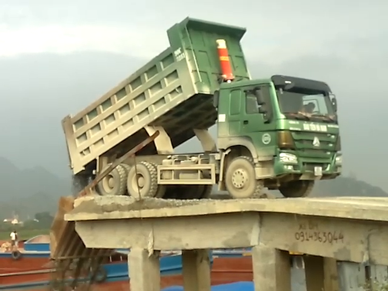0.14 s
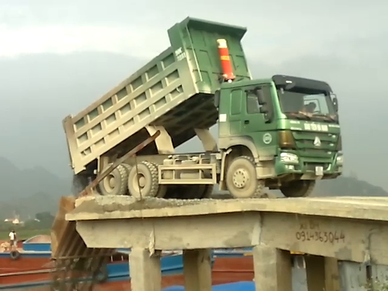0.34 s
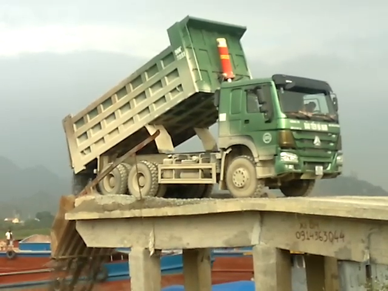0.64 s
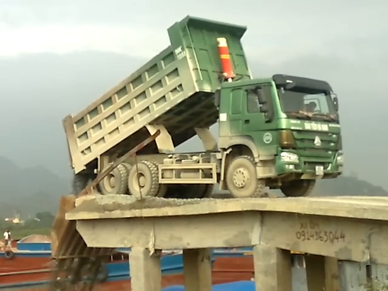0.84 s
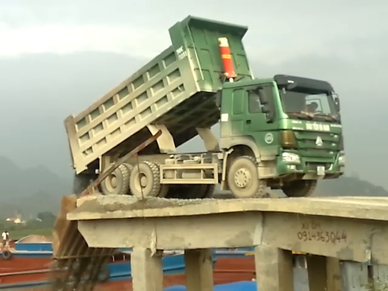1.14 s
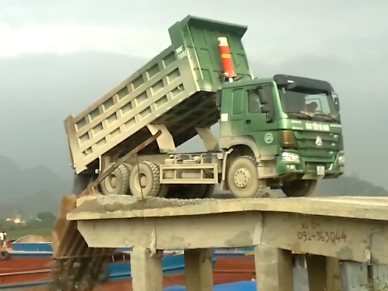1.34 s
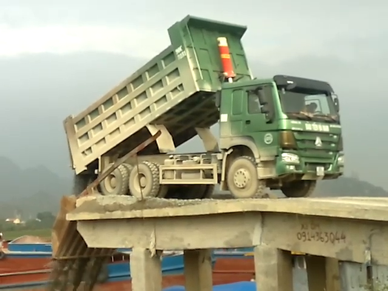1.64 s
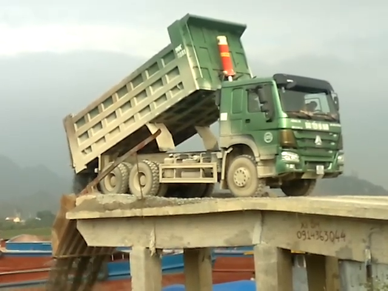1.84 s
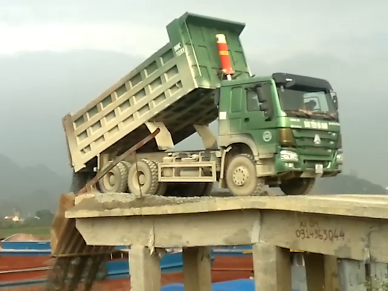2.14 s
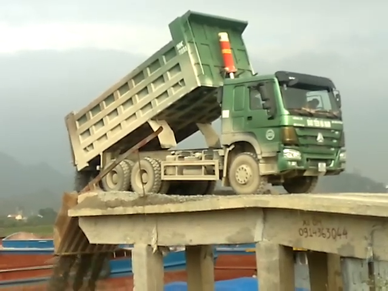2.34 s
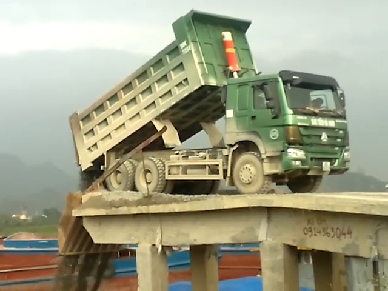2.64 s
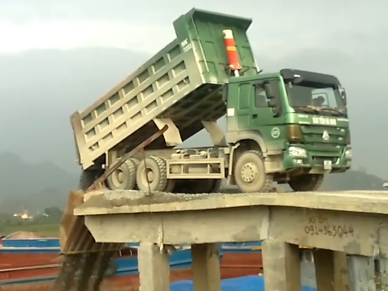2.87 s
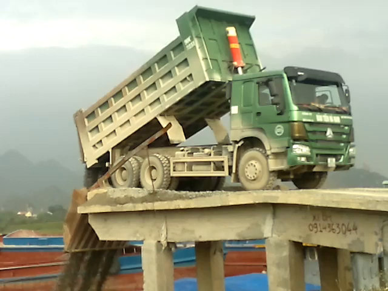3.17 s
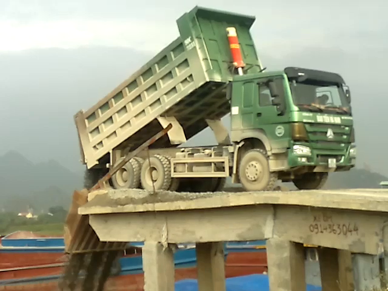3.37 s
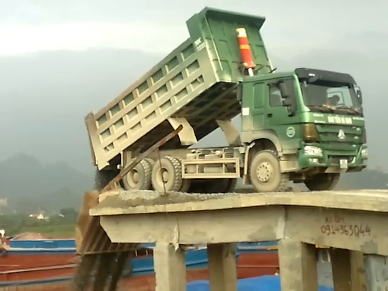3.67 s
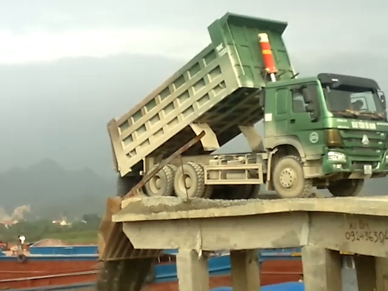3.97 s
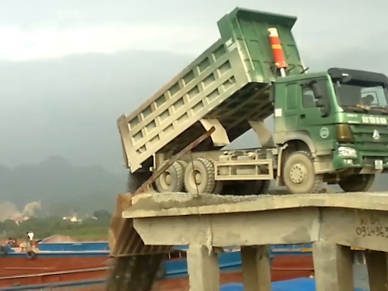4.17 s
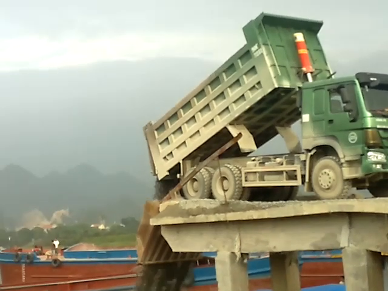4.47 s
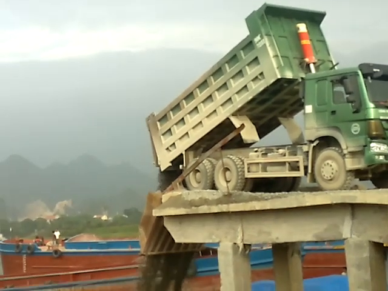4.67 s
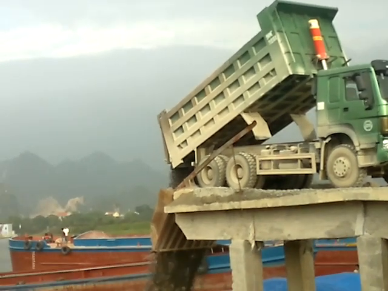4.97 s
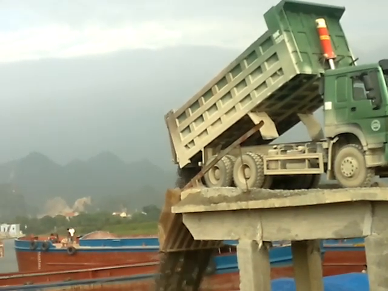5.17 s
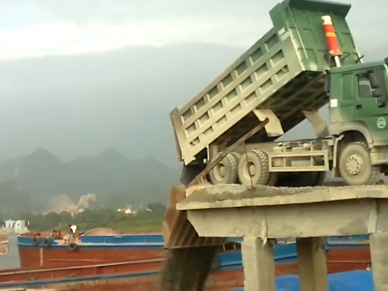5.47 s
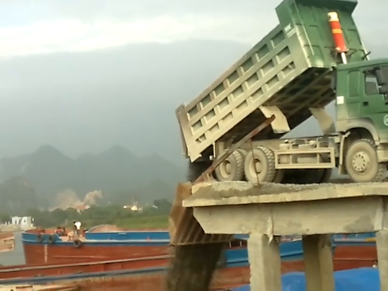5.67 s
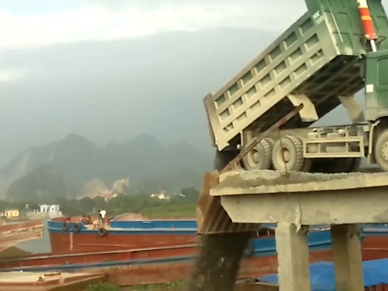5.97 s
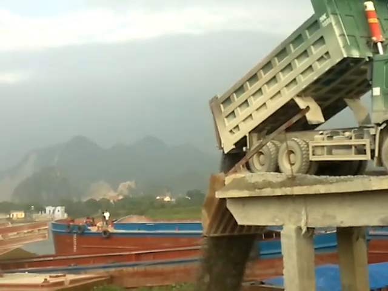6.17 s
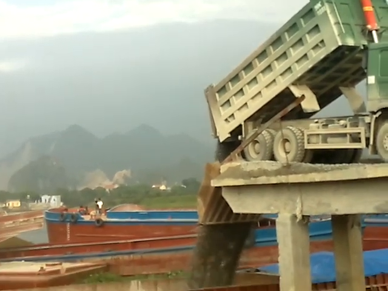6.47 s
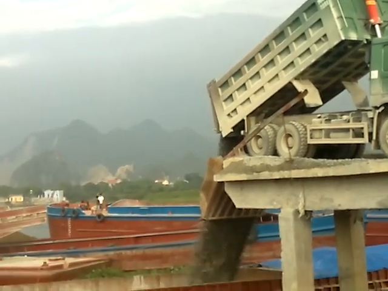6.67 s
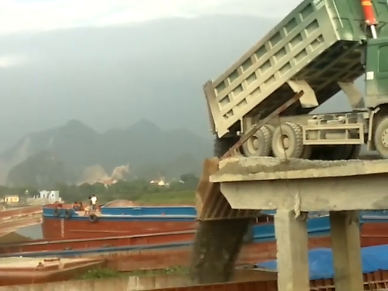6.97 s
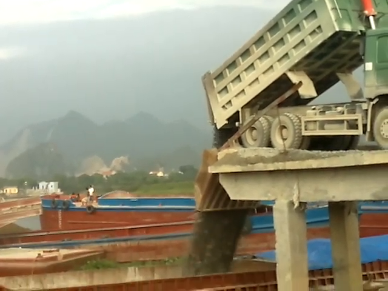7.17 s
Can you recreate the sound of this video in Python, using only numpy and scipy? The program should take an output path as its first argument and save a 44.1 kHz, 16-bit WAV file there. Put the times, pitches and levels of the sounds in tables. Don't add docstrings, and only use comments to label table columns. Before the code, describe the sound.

Outdoors at a loading quay, crushed rock streams continuously from a tipped truck down a steel chute into a barge. Countless knocks blend into a dense hiss with metallic colour. A diesel idles low beneath, the hollow hull gives soft deep thumps, and occasional heaps land in brief clattering bursts. One microphone some way off turns toward the falling stream, and the hiss brightens.

```python
import sys
import numpy as np
from scipy import signal
from scipy.fft import rfft, irfft, next_fast_len
from scipy.io import wavfile
from scipy.ndimage import uniform_filter1d

SR = 44100
rng = np.random.default_rng(int(sys.argv[2]) if len(sys.argv) > 2 else 0)


def log_audio(samples):
    frames = np.atleast_2d(samples).T
    limited = np.clip(frames, -1, 1)
    pcm = np.round(limited * 32767).astype(np.int16)
    wavfile.write(sys.argv[1], SR, pcm)


def volts_from_db(level):
    exponent = np.asarray(level, float) / 20
    return 10 ** exponent


N = 322806
TIME = np.arange(N) / SR


def evened(x):
    return x / np.sqrt(np.mean(abs(x) ** 2) + 1e-20)


def read(points, hz):
    f, value = np.transpose(points)
    return np.interp(np.log(hz + 1), np.log(f + 1), value)


def coloured(x, gain):
    size = next_fast_len(len(x))
    hz = np.fft.rfftfreq(size, 1 / SR)
    return irfft(rfft(x, size) * gain(hz), size)[:len(x)]


def bell(hz, centre_hz, width_hz):
    return 1 / (1 + (2 * (hz - centre_hz) / width_hz) ** 2)


def drift(shape, sizes):
    field = rng.standard_normal(shape)
    for axis, size in enumerate(sizes):
        for _ in range(2):
            field = uniform_filter1d(field, size, axis)
    return evened(field)


# (t/s, flow of stone level/dB, fineness of stone level/dB)
POUR = [(0, 0, -3.5), (.3, -1.5, -2), (1.2, -0.4, -1.2), (1.9, -0.3, -0.3), (2.5, -0.9, 0.9), (2.8, 0.2, 2),
        (3.1, 0.1, 1.3), (3.6, 0, -0.5), (4.15, 1.65, 0.5), (4.55, -0.3, .5), (5.0, 2.1, -0.7),
        (5.5, 0, -.3), (6.2, 0.2, 3.5), (6.6, 0.8, 1.4), (7.1, .9, 1.5), (7.32, 0.1, 0.5)]
PART_HZ = [
    1200,
    3900,
    7400,
    11500,
]
PART_FOLLOWS = [
    (.1, 0.055),
    (.95, .01),
    (.15, 0.39),
    (.1, 0.9),
]
# (f/Hz, level/dB per Hz)
STONE = [(300, -30), (450, -2.5), (554, -1), (900, -3.5), (1400, -2.5), (3400, -2), (4470, -0.5),
         (5800, -3), (7700, -4.5), (9500, -12), (12000, -19.5), (13800, -28), (14700, -31.5), (15700, -35)]
# (f/Hz, width/Hz, level/dB facing the
# truck, level/dB facing the barge)
RIPPLE = [(550, 49, 1, 1), (680, 120, 1.5, 0), (996, 130, -1.5, -3), (1192, 110, 2, 3), (1526, 74, 2, 2.5),
          (1840, 41, 4, 3.5), (1990, 140, -2, -4), (2125, 72, 0.5, 4.5), (2300, 51, -0.5, 1.5),
          (2700, 65, 0.5, -9), (2795, 86, 2, 3.5), (3080, 90, 0, -1), (3240, 110, 5, 2.5),
          (3363, 90, 7.5, 3), (3330, 89, -3.5, -6), (3700, 210, 3, 3), (3820, 98, -5.5, -7),
          (3896, 69, 4, -0.5), (4180, 73, -1.5, -5), (4334, 250, 2, 1.5), (4700, 100, -2.5, 1.5),
          (4960, 160, -0.5, 1), (5400, 160, -1, -0.5)]
# (t/s, share turned toward the barge)
TURN = [
    (0, 0.11),
    (3, 0.066),
    (4, 0.39),
    (5, 0.84),
    (6, 0.94),
    (7.32, 0.87),
]


def pour(knocks_per_s=9000, spread_db=2.0, near=.3, patchy_db=0.22, surge_db=0.36, low_hz=470, level_db=-15.5):
    strength = volts_from_db(spread_db * np.minimum(rng.exponential(1, N), 4))
    size = strength * rng.choice([-1., 1.], N)
    near_knocks = evened(size * (rng.random(N) < knocks_per_s / SR))
    knocks = near * near_knocks + rng.standard_normal(N)
    hz, t, z = signal.stft(knocks, SR, nperseg=1024, noverlap=768)

    s, flow, fine = np.transpose(POUR)
    parts_db = np.array(PART_FOLLOWS) @ [np.interp(t, s, flow), np.interp(t, s, fine)]
    shares = np.array([read(list(zip(PART_HZ, row)), hz) for row in np.eye(4)])

    turn = np.interp(t, *np.transpose(TURN))
    ripple_db = sum(bell(hz, f, width)[:, None] * (truck + (barge - truck) * turn)
                   for f, width, truck, barge in RIPPLE)
    patches_db = patchy_db * drift(z.shape, (14, 8))
    patches_db += surge_db * drift(z.shape, (90, 4))
    field_db = read(STONE, hz)[:, None] + shares.T @ parts_db + ripple_db + patches_db
    ground_echo = 1 + (low_hz / (hz[:, None] + 1)) ** 8
    z = z * volts_from_db(field_db) / ground_echo
    hiss = signal.istft(z, SR, nperseg=1024, noverlap=768)[1][:N]
    return volts_from_db(level_db) * evened(hiss)


# (t/s, firing f/Hz, level/dB of all its tones)
DIESEL = [(0, 36.43, -48), (.9, 37, -44), (1.3, 35.78, -45.5), (2.001, 36.43, -45), (3, 36.42, -46),
          (3.7, 36.34, -48.5), (4.8, 35.77, -49.5), (5.8, 35.15, -48), (6.3, 36.46, -49), (6.8, 36.76, -46),
          (7.32, 36.15, -48)]
# (multiple of the firing rate, level/dB)
ORDERS_DB = [(1, 3), (2, 1.5), (3, -13), (4, -5), (5, -2.5), (6, -3.5), (7, -10.5), (8, -8), (10, -16)]


def diesel():
    s, hz, tone_db = np.transpose(DIESEL)
    turns = np.cumsum(np.interp(TIME, s, hz)) / SR
    slow = np.arange(0, N + 512, 512)
    engine = np.zeros(N)
    for multiple, db in ORDERS_DB:
        waver_db = 2.2 * np.interp(np.arange(N), slow, drift(len(slow), (12,)))
        tone = np.sin(2 * np.pi * (multiple * turns + rng.random()))
        engine += volts_from_db(db + waver_db) * tone
    return volts_from_db(np.interp(TIME, s, tone_db) + 2.5) * engine


# (f/Hz, level/dB per Hz)
RUMBLE = [(12, -28), (20, -6.5), (43, -6), (101, -8.5), (225, -5), (278, -5.5), (326, -12.5), (383, -13.5),
          (420, -14), (480, -9), (620, 2.5), (1060, -120)]
# (t/s, peak level/dB, mode f/Hz)
THUMPS = [(0.0, -40, 51), (.22, -35.5, 34.5), (.52, -37, 36), (.77, -34, 42.8), (1.05, -37, 44),
          (1.21, -29, 34.2), (1.56, -41, 44.3), (1.77, -32, 34.7), (2.28, -39, 41), (2.71, -35, 34),
          (2.82, -35, 45), (3.09, -40, 45), (3.33, -40, 34.9), (3.59, -29, 34), (3.79, -40, 45),
          (4.1, -38, 36.8), (4.501, -38, 45.3), (4.88, -32, 45), (5.08, -42, 45), (5.5, -40, 44.6),
          (5.71, -35, 48), (5.9, -43, 51.4), (6.4, -37, 46), (6.62, -43, 50), (6.88, -43, 35),
          (7.17, -42, 44)]


def hull(rumble_db=-35.5, rise_s=0.082, t60_s=0.82, sag=.12, sag_s=0.092):
    rumble = coloured(rng.standard_normal(N), lambda hz: volts_from_db(read(RUMBLE, hz)) * (hz > 15) * (hz < 520))
    out = volts_from_db(rumble_db + 1.0) * evened(rumble)
    for s, db, mode_hz in THUMPS:
        since = np.maximum(TIME - s, 0)
        rise = np.sin(np.pi / 2 * np.minimum(since / rise_s, 1)) ** 2
        decay = volts_from_db(db + 3.5 - 60 * (since / t60_s) ** 1.5)
        cycles = mode_hz * (since - sag * sag_s * (1 - np.exp(-since / sag_s)))
        out += rise * decay * np.sin(2 * np.pi * cycles)
    return out


# (t/s, peak level/dB, ring f/Hz, length/s)
HEAPS = [(0.681, -22.5, 1480, 0.025), (.806, -26, 6750, .03), (1.972, -27, 7930, 0.033),
         (1.639, -22, 3300, 0.033), (2.806, -17.5, 3400, 0.032), (4.617, -26, 5300, 0.033),
         (4.638, -27, 7660, 0.026), (5.573, -16.5, 3720, 0.028), (6.71, -21, 5550, 0.033),
         (6.725, -26, 7600, .03), (6.944, -21, 4560, 0.028)]


def heaps(width_hz=2400):
    out = np.zeros(N)
    for s, db, ring_hz, length_s in HEAPS:
        burst = evened(coloured(rng.standard_normal(4096), lambda hz: bell(hz, ring_hz, width_hz)))
        u = TIME[:4096] / length_s
        swell = np.minimum(13.0 * u, 1) * np.exp(-u ** 3)
        part = out[round(s * SR):][:4096]
        part += volts_from_db(db) * (burst * swell)[:len(part)]
    return out


def scene():
    return np.tile(pour() + diesel() + hull() + heaps(), (2, 1))


FRAME = 1024


def lapped(x, first, window):
    sample = np.arange(2 * FRAME) + .5 + FRAME / 2
    basis = np.cos(np.pi / FRAME * np.outer(sample, np.arange(FRAME) + .5))
    lead, count = 2 * FRAME - first, N // FRAME + 4
    blocks = np.pad(x, (lead, count * FRAME - N - lead)).reshape(count, FRAME)

    def back(z):
        frames = (z @ basis.T) * window * 2 / FRAME
        starts = np.pad(frames[:, :FRAME], ((0, 1), (0, 0)))
        ends = np.pad(frames[:, FRAME:], ((1, 0), (0, 0)))
        return (starts + ends).ravel()[lead:lead + N]

    pairs = np.hstack([blocks[:-1], blocks[1:]])
    return (pairs * window) @ basis, back


def rounded(z, steps, wobble_db):
    wobble = np.repeat(rng.standard_normal((len(z), FRAME // 32)), 32, axis=1)
    hz = (np.arange(FRAME) + .5) * SR / 2 / FRAME
    step = volts_from_db(read(steps, hz) + wobble_db * wobble)
    rung = np.floor(abs(z / step) ** .75 + .4054)
    return np.sign(z) * step * rung ** (4 / 3)


# (f/Hz, step level/dB)
EARLY_STEPS = [(200, -12), (5000, -3), (8000, -1), (10000, 3), (12000, 5), (13500, 2), (14600, -1),
               (15500, 0)]


def first_rounding(x):
    z, back = lapped(x, 447, signal.windows.cosine(2 * FRAME))
    return back(rounded(z, EARLY_STEPS, wobble_db=1.9))


# (f/Hz, step level/dB)
LATE_STEPS = [(300, -12), (1000, -3), (4800, 0), (7000, -2.5), (9000, -7.5), (11500, -11), (13500, -10),
              (15700, -8)]
# (frame, low f/Hz, high f/Hz)
SWAPS = [(24, 9650, 11020), (25, 8960, 10340), (26, 7580, 8960), (58, 5170, 6200), (58, 11710, 13090),
         (70, 5170, 6890), (74, 4220, 5170), (106, 5690, 7580), (123, 6890, 8960), (154, 8270, 10340),
         (169, 6890, 8270), (206, 4650, 5690), (206, 8270, 9650), (208, 5170, 6200), (216, 5690, 6890),
         (220, 5690, 6890), (228, 6890, 8270), (245, 8270, 9650), (249, 4650, 5690), (250, 5690, 6890),
         (283, 5170, 8960), (309, 6890, 8270)]


def second_rounding(x):
    z, back = lapped(x, 726, signal.windows.kaiser_bessel_derived(2 * FRAME, 4 * np.pi))
    sides = np.tile(rounded(z, LATE_STEPS, wobble_db=4.0), (2, 1, 1))
    for frame, low, high in SWAPS:
        bins = slice(low * 2 * FRAME // SR, high * 2 * FRAME // SR)
        fill = rng.standard_normal((2, bins.stop - bins.start))
        sides[:, frame + 1, bins] = np.std(z[frame + 1, bins]) * fill
    return np.array([back(side) for side in sides])


def band_limit(x):
    return signal.sosfilt(signal.butter(12, 15750, fs=SR, output="sos"), x)


def record(dry):
    mix = second_rounding(first_rounding(dry[0]))
    return band_limit(mix)


dry = scene()
out = record(dry)
log_audio(out)
```